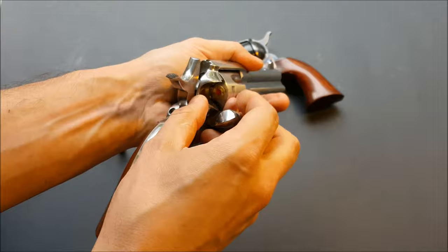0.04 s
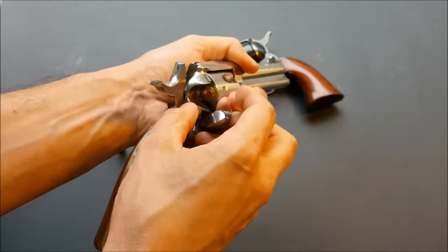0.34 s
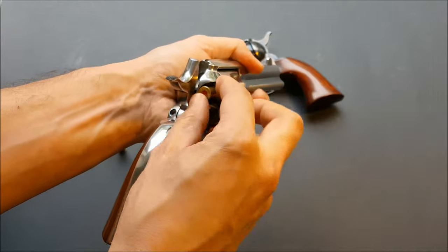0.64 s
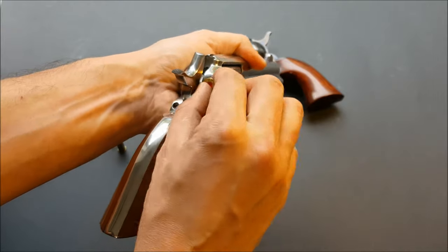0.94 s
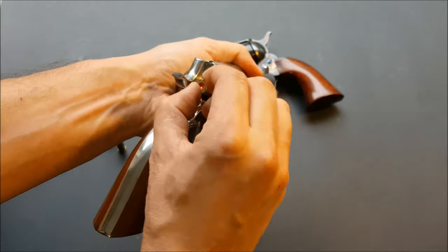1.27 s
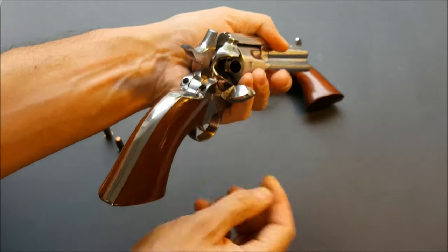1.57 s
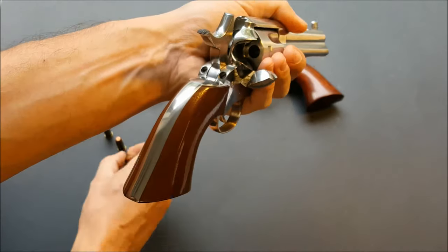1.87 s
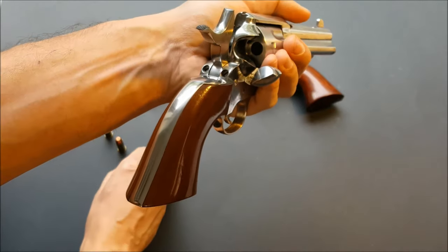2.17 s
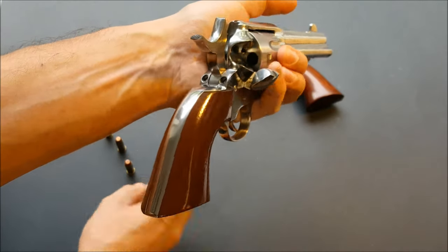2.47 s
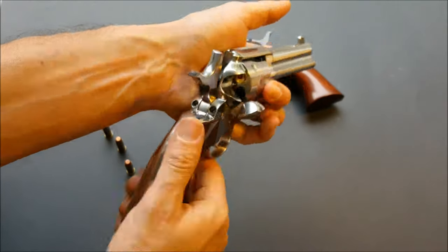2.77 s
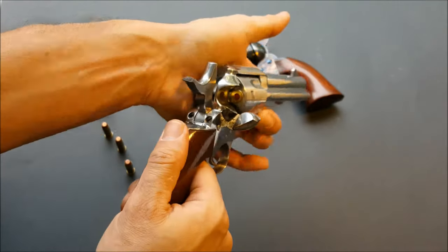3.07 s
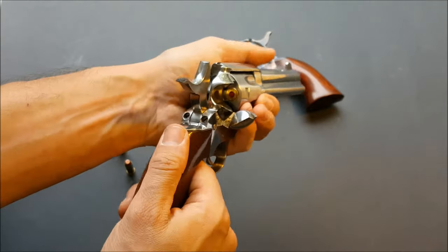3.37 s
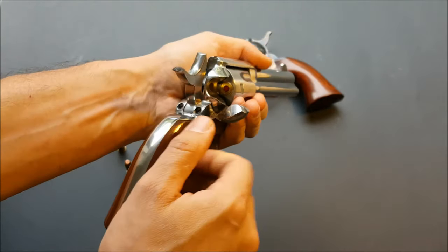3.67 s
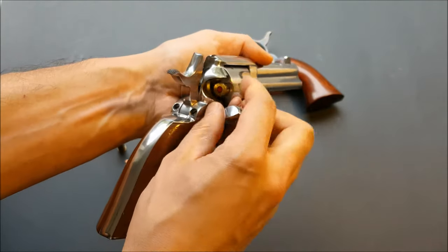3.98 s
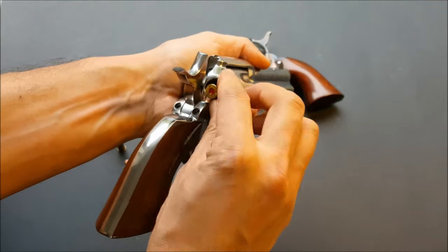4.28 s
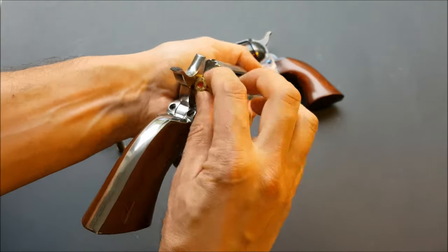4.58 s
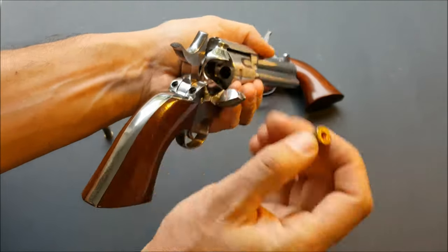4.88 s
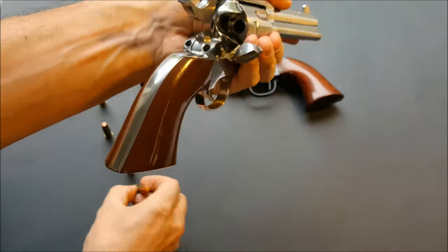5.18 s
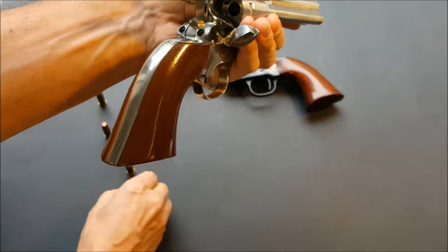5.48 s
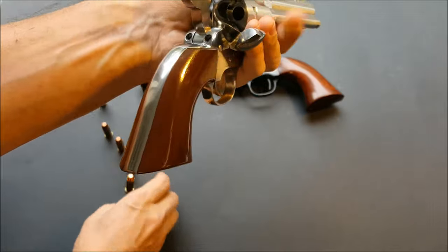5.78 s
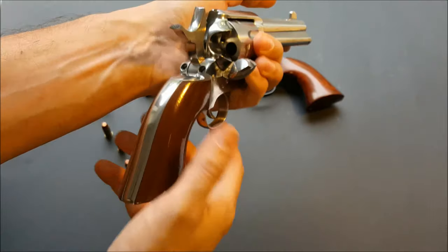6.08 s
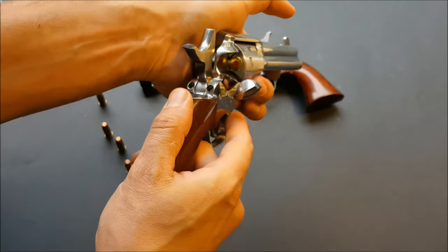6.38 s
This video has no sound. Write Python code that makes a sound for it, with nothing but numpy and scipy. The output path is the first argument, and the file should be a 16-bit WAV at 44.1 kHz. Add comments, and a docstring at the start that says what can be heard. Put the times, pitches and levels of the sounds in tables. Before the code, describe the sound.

A revolver is unloaded by hand, close to the microphone, in a small room with a faint electrical hum. A brass cartridge scrapes and ticks out of its chamber and is set on the table with a knock. The cylinder snaps into place with a brief steel ring. A second cartridge slides out and is put down softly. Something hard drops and bounces on the table, and the cylinder snaps again.

```python
"""A single-action revolver is unloaded by hand, close by, over a table in a small room where mains hum.
A brass cartridge is picked at, slides from its chamber with friction and light ticks, and is stood on
the table (2.2 s); the cylinder is turned on and snaps into its stop, ringing the steel (3.0 s). A second
cartridge slides out as a faint drone swells, and is set down softly (5.6 s). Something hard falls on the
table and bounces (6.0 s), and the cylinder snaps into its stop again (6.4 s)."""
import sys
import numpy as np
from scipy import signal
from scipy.fft import rfft, irfft, next_fast_len
from scipy.io import wavfile
from scipy.ndimage import uniform_filter1d

SR = 44100
rng = np.random.default_rng(int(sys.argv[2]) if len(sys.argv) > 2 else 0)


def generate_wav(sig):
    """Save sig (samples, or channels by samples) to the path in sys.argv[1] as 16-bit PCM at SR."""
    pcm = np.round(np.clip(np.atleast_2d(sig).T, -1, 1) * 32767).astype(np.int16)
    wavfile.write(sys.argv[1], SR, pcm)


N = 287973
T = np.arange(N) / SR
RING_T = T[:SR // 3]  # time axis of one impact

# mains hum: pitch_hz, level_db
HUM_TONES = [(58.9, -62), (117.6, -68.5), (358, -75)]
# spectrum of the room's still air: frequency_hz, gain_db
AIR_SPECTRUM = [(88, -37.5), (150, -5.5), (259, -4.5), (286, -1), (361, -6), (439, -10.5), (745, -16.5),
                (805, -10.5), (871, -17), (1170, -20), (2310, -22.5), (10600, -36), (14200, -29),
                (16000, -40)]
# spectrum of the low rumble: frequency_hz, gain_db
RUMBLE_SPECTRUM = [(20, -13.5), (45, -9.5), (75, 2.5), (125, 1.5), (170, -4.5), (260, -39)]
# swell of a faint low drone: peak_s, rise_s, fall_s, level_db
DRONE_SWELLS = [(4.53, .12, .17, -62.5)]

# broad response of a cartridge in its chamber: frequency_hz, gain_db
CHAMBER_SPECTRUM = [(200, -39), (600, -9.5), (1000, -8), (1500, -10.5), (2200, -1), (3300, 2), (4400, -2.5),
                    (6300, -4), (8500, -5.5), (11000, -14.5), (14000, -9), (16000, -25)]
# its resonances: centre_hz, width_hz, gain_db
CHAMBER_RESONANCES = [(1470, 510, 13.3), (1750, 27, 7.9), (2700, 110, 5.4), (3200, 40, 3.2), (3690, 540, 3),
                      (4200, 38, 0.59), (5350, 580, 2.9), (5520, 37, 6.7), (5940, 83, 4.9),
                      (6550, 120, 8.2), (7550, 100, 5.9), (8160, 130, 9.3), (9370, 110, 13),
                      (11400, 120, 8.3), (13200, 230, 3.2), (15200, 330, 4.9)]
# fingers and brass rubbing on the gun: start_s, length_s, relative_db, touch
RUBS = [(0.356, 0.034, -58.5, "light"), (0.41, 0.013, -54.5, "firm"), (0.436, 0.11, -43.5, "firm"),
        (0.611, 0.076, -54.5, "firm"), (1.264, 0.06, -55, "padded"), (1.575, .06, -61, "light"),
        (1.662, 0.0076, -50, "light"), (3.824, 0.044, -60, "light"), (3.97, 0.054, -45, "firm"),
        (4.049, 0.017, -54.5, "light"), (4.078, 0.079, -46.5, "firm"), (4.23, 0.072, -59.5, "firm"),
        (4.357, 0.018, -52, "padded"), (4.979, 0.042, -44, "firm")]
# ways of rubbing (a light touch lets the chamber ring), by touch: treble_db, hollow_db
TOUCHES = {"light": (5.7, 1), "firm": (0.85, -20.5), "padded": (-11.5, -28)}
# a cartridge drawn along its chamber: fastest_s, relative_db, hollow_db
DRAWS = [(1.519, -45, -8), (1.638, -50, 1.5), (5.002, -42.5, -3)]
# fingertips brushing the cartridge between strokes: peak_s, rise_s, fall_s, relative_db
BRUSH = (4.88, .06, .14, -70.5)

# cartridge ticking against chamber and gate: start_s, level_db, contact
TICKS = [(.3810, -56, "deep"), (0.452, -42.5, "rim"), (.6212, -56, "padded"), (1.2874, -50.5, "padded"),
         (1.2953, -50.5, "padded"), (1.531, -47.5, "side"), (1.6607, -42.5, "rim"), (3.8274, -61, "side"),
         (3.9897, -43.5, "side"), (4.0210, -50, "deep"), (4.0500, -48, "side"), (4.0864, -41, "deep"),
         (4.0980, -39, "deep"), (4.6071, -52.5, "loose"), (4.6240, -44, "loose"), (4.6644, -47.5, "padded"),
         (4.6728, -42.5, "loose"), (4.7325, -61, "rim"), (5.103, -50, "rim")]
# ways of tapping, by contact: treble_db, case_ring_db, hollow_db
CONTACTS = {"padded": (-19.5, -23, 2.4), "side": (1, -24, 0), "deep": (-1, -26, 10), "rim": (7.2, -13, 5.1),
            "loose": (2.2, 4, 1)}
# modes of the thin brass case: pitch_hz, relative_db, t60_s
CASE_MODES = [(10650, -11, .012), (12850, -5, .012), (13380, 0, .022), (13580, 0, .018), (13750, -4, .018)]

# knocks on the table (harder contact, higher corner): start_s, level_db, corner_hz, first_flight_s
KNOCKS = [(2.1760, -28.5, 1830, 0.014), (5.5551, -41.5, 860, 0), (6.0206, -19.5, 3190, .0728)]
# modes of the table top: pitch_hz, relative_db, t60_s
TABLE_MODES = [(240, -29, .1), (277, -15, 0.11), (352, -12, 0.38), (482, -19, .06), (507, -2.5, .12),
               (532, -15.5, 0.078), (600, -3.5, 0.16), (620, -3, .05), (798, -2.5, 0.067), (860, -11, 0.23),
               (1053, -9.5, 0.089), (1140, -7, .09), (1313, -8, 0.07), (1495, -12, 0.043),
               (1664, 12.5, 0.041), (1907, 0.5, 0.02), (2035, 1, 0.03), (2275, -4.5, 0.073),
               (2655, 7, 0.042), (2760, -3.5, 0.025)]
# spectrum of its crowded, quickly damped modes: frequency_hz, gain_db
THUD_SPECTRUM = [(80, 1), (170, -32.5), (270, -5), (450, -5), (1000, 2.5), (1700, 3.5), (2800, 5),
                 (3900, 3.5), (4800, -5), (7000, -8), (14000, -29)]

# cylinder snapping into its stop: start_s, relative_db, chatter_s, chatter_db
SNAPS = [(2.9846, -20, .0026, 1.5), (6.4360, -19, .0028, 1)]
# modes of the steel cylinder and frame: pitch_hz, t60_s, first_snap_db, second_snap_db
STEEL_MODES = [(2530, 0.01, -21.5, -13), (2840, 0.12, -14.5, -12), (3190, 0.037, -9.5, -38),
               (3430, .05, -11, -10), (4000, .04, -20.5, -16), (4630, 0.0072, -7, -7.5),
               (4660, .03, -13, -15), (6050, 0.031, -12.5, -24), (5940, .035, 0, -8),
               (6050, 0.049, -12.5, -4.5), (6560, .03, -19, -32), (7360, 0.019, 0, -12),
               (7730, 0.047, -12, 5.5), (7640, 0.025, 0.5, -25), (8190, .035, -7.5, -23),
               (8840, .03, -10.5, -15), (8930, 0.077, -11.5, -8), (11900, .03, -17, -19),
               (11370, .03, -11.5, -5), (11775, 0.012, -8, -21), (11540, .035, -15, -21),
               (13310, .04, -15.5, -8), (12260, 0.041, -7.5, -4), (13800, 0.035, -8.5, -2),
               (14700, 0.03575, -9.5, -3)]
# spectrum of the crack of steel on steel: frequency_hz, gain_db
CRACK_SPECTRUM = [(150, -27.5), (800, -28.5), (1200, -9), (1650, -13), (2000, -3), (3200, -3), (4200, -5.5),
                  (5300, 0.5), (6600, -6), (8300, -6), (10000, -4), (11300, -0.5), (13500, -2.5),
                  (16000, -11.5)]

# reverberation of the room: frequency_hz, t60_s
ROOM_DECAY = [(200, 0.32), (600, 0.28), (1600, 0.17), (4000, 0.2), (8000, 0.2), (14000, 0.145)]


def undb(db):
    """Amplitude ratio of a level in decibels."""
    return 10 ** (np.asarray(db) / 20)


def unit(x):
    """Normalisation to rms 1."""
    return x / np.sqrt(np.mean(x ** 2))


def unit_energy(x):
    """Normalisation of an impact to the energy of 10 ms at rms 1."""
    return x / np.sqrt(np.sum(x ** 2, axis=-1, keepdims=True) / (SR * .01))


def bins_hz(size):
    """Frequencies of a Fourier transform, floored at 1 Hz."""
    return np.maximum(np.fft.rfftfreq(size, 1 / SR), 1)


def along(points, hz):
    """Interpolation of (frequency_hz, value) points on a logarithmic frequency axis."""
    frequencies, values = np.transpose(points)
    return np.interp(np.log(hz), np.log(frequencies), values)


def colour(x, db_at):
    """Minimum-phase filtering with the gain db_at(hz), by folding the cepstrum."""
    size = 16384
    cepstrum = irfft(np.log(undb(db_at(bins_hz(size)))))
    cepstrum[1:size // 2] *= 2
    cepstrum[size // 2 + 1:] = 0
    response = irfft(np.exp(rfft(cepstrum)))[None, :size // 2]
    return signal.oaconvolve(x, response, axes=1)[:, :x.shape[1]]


def diffuse_noise(size, apart_hz):
    """A diffuse field at two points: coherent below apart_hz, incoherent above."""
    mid, side = rfft(rng.standard_normal((2, size)))
    hz = np.fft.rfftfreq(size, 1 / SR)
    share = hz / np.hypot(hz, apart_hz)
    return irfft(np.array([mid + side * share, mid - side * share]) / np.sqrt(1 + share ** 2), size)


def decay(t60):
    """Exponential damping by 60 dB in t60 seconds."""
    return np.exp(-np.log(1000) * RING_T / t60)


def burst(t60, apart_hz):
    """Modal overlap: a struck body's crowded modes merge into brief noise, flattened to have no pitch."""
    spectrum = rfft(diffuse_noise(len(RING_T), apart_hz) * decay(t60))
    smoothed = np.sqrt(uniform_filter1d(abs(spectrum) ** 2, size=200) + 1e-12)
    return unit_energy(irfft(spectrum / smoothed, len(RING_T)) * (RING_T < RING_T[-1] / 2))


def ring(modes, apart_hz, scatter_rad):
    """Free vibration as a sum of damped modes; the higher ones arrive left and right out of phase."""
    out = 0
    for hz, db, t60 in modes:
        phase, skew = rng.uniform(-1.21, 1, 2)
        lag = np.pi * skew * hz / np.hypot(hz, apart_hz) * np.array([[.5], [-.5]])
        out = out + undb(db) * decay(t60) * np.sin(2 * np.pi * hz * RING_T + scatter_rad * phase + lag)
    return unit_energy(out)


def swell(peak_s, rise_s, fall_s):
    """An asymmetric Gaussian envelope that reaches 1 at peak_s."""
    return np.exp(-((T - peak_s) / np.where(T < peak_s, rise_s, fall_s)) ** 2 / 2)


def pan(x, pan_db):
    """Direction as a level difference, left minus right."""
    return x * undb(np.array([[.5], [-.5]]) * pan_db)


def add(out, start_s, x):
    """Superposition of a sound from start_s on."""
    i = int(start_s * SR)
    out[:, i:i + x.shape[1]] += x[:, :N - i]


def background():
    """Mains tones with slow phase modulation lie over filtered noise: air, rumble and a passing drone."""
    hum = 0
    for hz, db in HUM_TONES:
        waver = np.interp(T, np.linspace(0, T[-1], num=40), rng.standard_normal(size=40))
        hum = hum + undb(db) * np.sqrt(2) * np.sin(2 * np.pi * hz * T + waver * hz / 300)
    air = unit(colour(diffuse_noise(N, apart_hz=617), lambda hz: along(AIR_SPECTRUM, hz)))
    rumble = unit(colour(diffuse_noise(N, apart_hz=450), lambda hz: along(RUMBLE_SPECTRUM, hz)))
    band = resonate(diffuse_noise(N, apart_hz=650), centre_hz=290, half_width_hz=50)
    drone = band * sum(undb(db) * swell(*timing) for *timing, db in DRONE_SWELLS)
    return pan(hum + undb(-63.5) * air + undb(-68) * rumble + drone, pan_db=.8)


def resonance(hz, centre_hz, half_width_hz):
    """The Lorentzian curve of a damped resonator, 1 at its centre."""
    return 1 / (1 + ((hz - centre_hz) / half_width_hz) ** 2)


def resonate(x, centre_hz, half_width_hz):
    """Forced vibration: a resonator selects one band of its excitation, here scaled to rms 1."""
    return unit(colour(x, lambda hz: 20 * np.log10(resonance(hz, centre_hz, half_width_hz))))


def chamber_db(hz):
    """Frequency response of a cartridge in its chamber: resonances on a broad spectrum."""
    peaks_db = sum(db * resonance(hz, centre, width / 2) for centre, width, db in CHAMBER_RESONANCES)
    return along(CHAMBER_SPECTRUM, hz) + peaks_db


def treble(hz):
    """High-pass weight for the range in which a padded contact no longer excites the steel."""
    return 1 / (1 + (3600 / hz) ** 12)


def rub(start_s, length_s, attack_s=.0076, sag_db_per_s=66, release_s=.01):
    """Friction envelope of a rub: it bites quickly, eases off and dies away exponentially."""
    attack = np.minimum(RING_T / attack_s, 1)
    sag = undb(-sag_db_per_s * RING_T)
    release = np.exp(-np.maximum(RING_T - length_s, 0) / release_s)
    return np.interp(T - start_s, RING_T, attack * sag * release, right=0)


def draw(fastest_s, slope_db_per_s=444, rounding_s=.0072):
    """Friction follows sliding speed: the envelope of a cartridge that speeds up and slows again."""
    away_s = np.minimum(abs(T - fastest_s), .5)
    return undb(-slope_db_per_s * (np.hypot(away_s, rounding_s) - rounding_s))


def strokes(bright_db=3.5):
    """Every sliding contact that excites the chamber: envelope, relative_db, treble_db, hollow_db."""
    *brush_timing, brush_db = BRUSH
    rubs = [(rub(start_s, length_s), db, *TOUCHES[touch]) for start_s, length_s, db, touch in RUBS]
    draws = [(draw(fastest_s), db, bright_db, hollow_db) for fastest_s, db, hollow_db in DRAWS]
    return rubs + draws + [(swell(*brush_timing), brush_db, bright_db, 0)]


def catches(rate_per_s=200, decay_s=.00095):
    """Stick-slip: sparse larger jolts give friction its grain."""
    jolts = (rng.random(N) < rate_per_s / SR) * rng.uniform(.38, 1, N)
    return unit(signal.lfilter([1], [1, -np.exp(-1 / (decay_s * SR))], jolts + 1e-18))


def cartridge_friction(slips_per_s=3000):
    """Sliding friction: tiny uneven slips excite the chamber and the hollow note of the air in it."""
    slips = (rng.random(N) < slips_per_s / SR) * undb(1.1 * np.minimum(rng.exponential(size=N), 6))
    grit = diffuse_noise(N, apart_hz=3000) * np.hypot(unit(slips + .28), undb(-12) * catches())
    body = unit(colour(grit, chamber_db))
    size = next_fast_len(N, True)
    high = irfft(rfft(body, size) * treble(bins_hz(size)), size)[:, :N]
    hollow = resonate(grit, centre_hz=3300, half_width_hz=350)
    # overlapping strokes add in power
    power = sum(np.outer(undb([db, db + treble_db, db + hollow_db]) ** 2, envelope ** 2)
                for envelope, db, treble_db, hollow_db in strokes())
    low_gain, high_gain, hollow_gain = np.sqrt(power)
    return undb(-4.5) * ((body - high) * low_gain + high * high_gain + hollow * hollow_gain)


def cartridge_ticks():
    """Light impacts, damped by the fingers, excite the chamber; a free case rings in very high modes."""
    out = np.zeros((2, N))
    for start_s, db, contact in TICKS:
        treble_db, case_db, hollow_db = CONTACTS[contact]

        def tap_db(hz):
            """The chamber's response, weighted by the kind of contact."""
            hollow = resonance(hz, centre_hz=3130, half_width_hz=400)
            return chamber_db(hz) + treble_db * treble(hz) + hollow_db * hollow

        tap = unit_energy(colour(burst(t60=.018, apart_hz=2500), tap_db))
        case = pan(ring(CASE_MODES, apart_hz=2500, scatter_rad=np.pi), pan_db=2)
        add(out, start_s, undb(db) * tap + undb(db + case_db) * case)
    return out


def edge_echo(delay_at_1khz_s=.0089):
    """Dispersion: low bending waves travel slower, so the table's edge returns a falling chirp."""
    hz = bins_hz(len(RING_T))
    phase = 4 * np.pi * delay_at_1khz_s * np.sqrt(1000 * hz)
    passband = 1 / np.sqrt((1 + (hz / 1250) ** 6) * (1 + (480 / hz) ** 6))
    return unit_energy(irfft(passband * np.exp(-1j * phase), len(RING_T)))


def knock(corner_hz):
    """An impact excites the table's modes; a softer contact lasts longer and so leaves out the highs."""
    def contact_db(hz):
        """A low-pass contact with a trace of the hard rim; the board radiates little deep bass."""
        rim = 1 + (hz / 5200) ** 8
        return 10 * np.log10(rim / (1 + (hz / corner_hz) ** 6.22) / (1 + (200 / hz) ** 4))

    thud = unit_energy(colour(burst(t60=.028, apart_hz=1500), lambda hz: along(THUD_SPECTRUM, hz)))
    modes = ring(TABLE_MODES, apart_hz=2600, scatter_rad=1.8)
    top = modes + undb(-.5) * thud + undb(-9) * edge_echo()
    return unit_energy(colour(top, contact_db))


def table_knocks(restitution=.595):
    """Inelastic impact: what is set down knocks once; what falls rebounds ever sooner, weaker, softer."""
    out = np.zeros((2, N))
    for start_s, db, corner_hz, flight_s in KNOCKS:
        for _ in range(5 if flight_s > .02 else 1):
            add(out, start_s, undb(db) * knock(corner_hz))
            start_s += flight_s
            flight_s *= restitution
            db -= 5.5
            corner_hz *= .79
    return out


def cylinder_snaps():
    """Impact and chatter: the stop drops into its notch; each snap weights the steel's modes anew."""
    out = np.zeros((2, N))
    for k, (start_s, db, chatter_s, chatter_db) in enumerate(SNAPS):
        modes = [(hz, levels_db[k], t60) for hz, t60, *levels_db in STEEL_MODES]
        add(out, start_s, undb(db - 3.5) * ring(modes, apart_hz=2500, scatter_rad=np.pi))

        def steel_db(hz):
            """The crack's spectrum, lifted by resonance around every mode."""
            lift = sum(undb(mode_db + 13) ** 2 * resonance(hz, mode_hz, half_width_hz=130)
                       for mode_hz, mode_db, _ in modes)
            return along(CRACK_SPECTRUM, hz) + 10 * np.log10(1 + lift)

        # the first blow, then two rebounds
        for delay_s, blow_db in [(0, -5), (chatter_s / 2, chatter_db - 11),
                                 (chatter_s, chatter_db - 7.5)]:
            crack = unit_energy(colour(burst(t60=.02, apart_hz=2500), steel_db))
            add(out, start_s + delay_s, undb(db + blow_db) * crack)
    return out


def room(x, wet_db, pan_db=0):
    """Reverberation: diffuse reflections build up after the direct sound; the treble dies first."""
    size = len(RING_T)
    noise = rfft(diffuse_noise(size, apart_hz=500))
    tail = 0
    for centre_hz, t60 in ROOM_DECAY:
        band = along([(hz, hz == centre_hz) for hz, _ in ROOM_DECAY], bins_hz(size))
        tail = tail + irfft(noise * band, size) * decay(t60)
    tail *= 1 - np.exp(-(RING_T / .0045) ** 4)
    tail /= np.sqrt(np.sum(tail ** 2, axis=1, keepdims=True))
    return pan(x, pan_db) + undb(wet_db) * signal.fftconvolve(x, tail, axes=1)[:, :N]


def scene():
    """The reverberant share grows with distance: the gun is near, the table further off."""
    cylinder = room(cylinder_snaps(), wet_db=-9, pan_db=3)  # the notch lies to the left
    cartridges = room(cartridge_ticks() + cartridge_friction(), wet_db=-10, pan_db=.3)
    table = room(table_knocks(), wet_db=-5.5)
    return background() + cartridges + table + cylinder


def record(dry):
    """Band limiting: a steep elliptic low-pass removes the top of the treble."""
    top_hz = 16200
    return signal.sosfilt(signal.ellip(10, .2, 80, top_hz, fs=SR, output="sos"), dry)


dry = scene()
out = record(dry)
generate_wav(out)
```